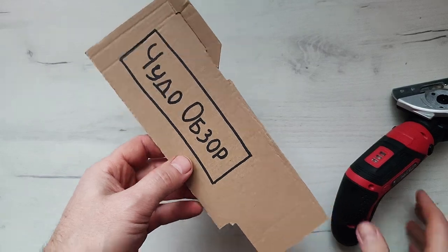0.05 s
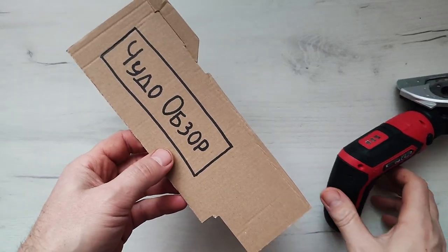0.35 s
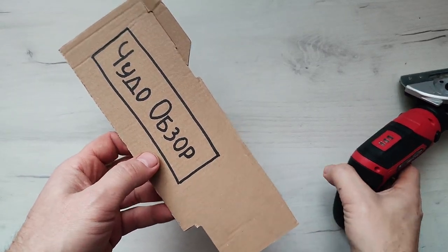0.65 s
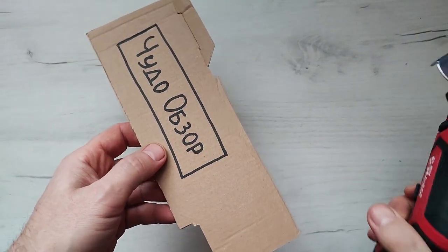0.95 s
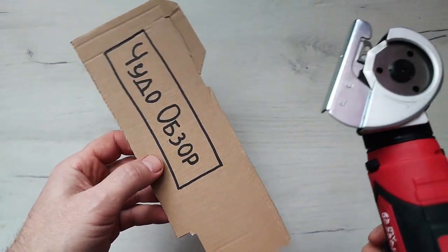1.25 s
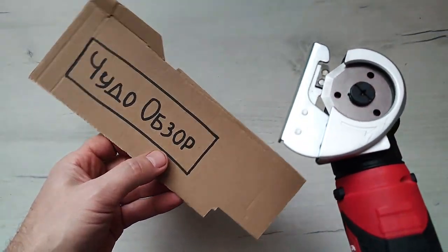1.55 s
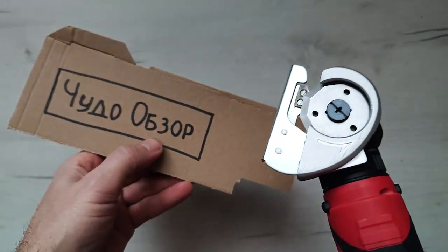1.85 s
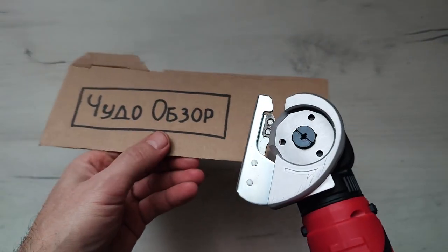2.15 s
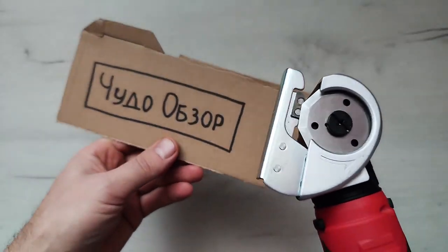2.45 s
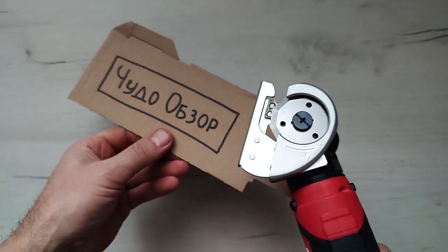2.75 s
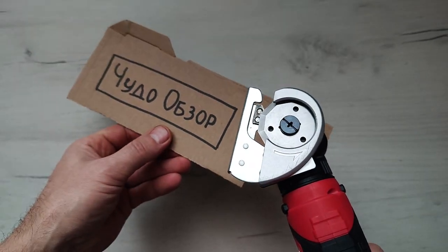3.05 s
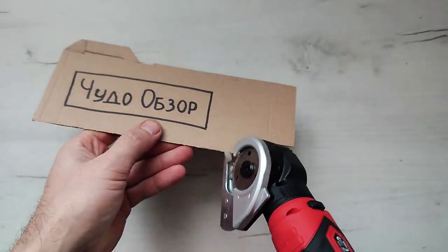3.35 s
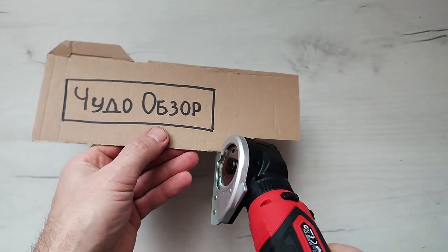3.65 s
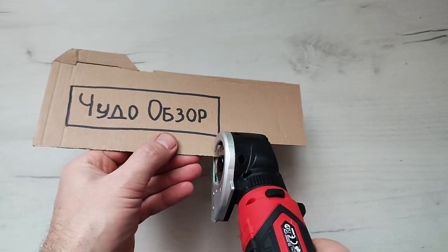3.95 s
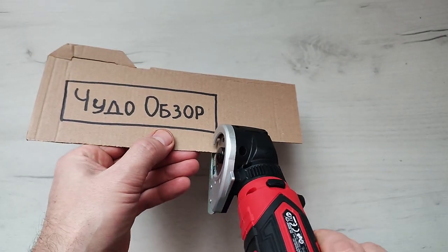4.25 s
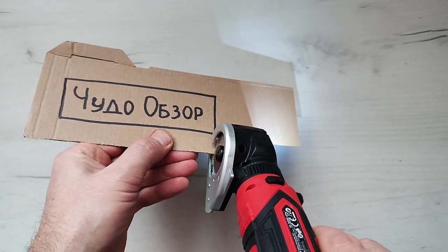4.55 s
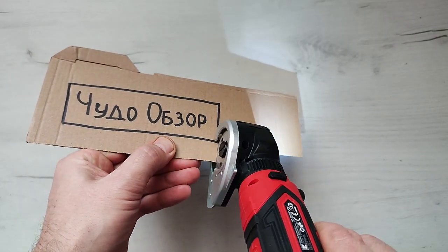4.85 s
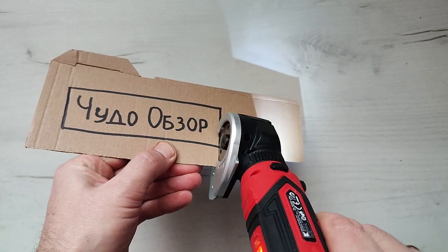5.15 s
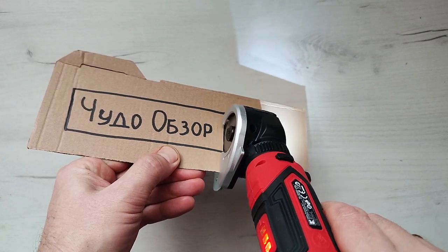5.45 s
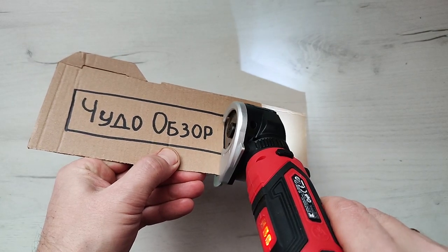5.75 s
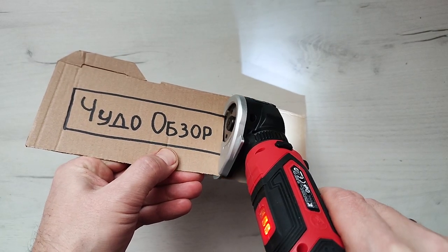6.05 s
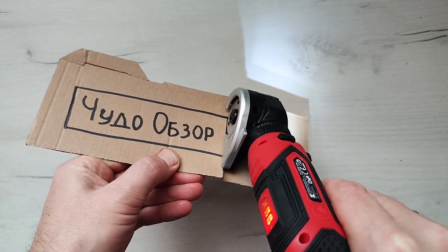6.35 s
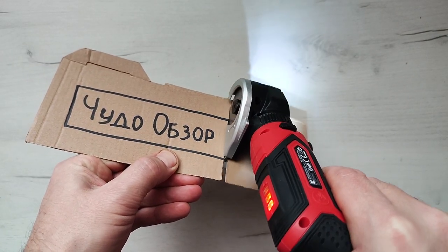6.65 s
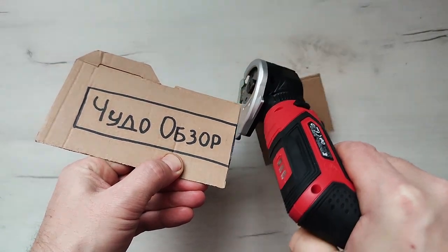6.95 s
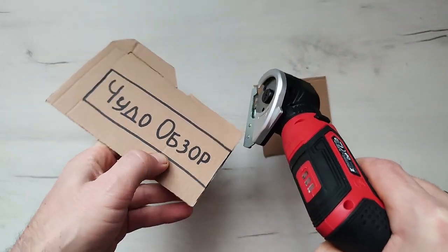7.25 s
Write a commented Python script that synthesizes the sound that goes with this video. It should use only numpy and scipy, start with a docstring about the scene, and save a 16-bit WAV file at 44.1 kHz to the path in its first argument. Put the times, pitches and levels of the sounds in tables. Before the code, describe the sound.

A cordless cutter is dragged briefly on a table and lifted with a clunk. Fingers faintly rustle and tap a cardboard sheet, and the tool's guard scrapes its edge. The small motor then spins up with a rattling gear whine, and the blade chews through the card in rapid, crunchy bites that climb in pitch. The last strip snaps and the motor coasts to rest. Everything is close to the microphone in a quiet room.

```python
"""Cutting cardboard with a rotary blade

A cordless screwdriver with a cutting head is dragged off a table, lifted and set against a card sheet.
Its motor spins up, the gears whine and rattle, and the many-sided blade, geared to it, bites about
thirty times a second. The card's resonance climbs as the cut advances; the last strip tears through,
and the motor coasts to rest in a quiet room."""
import sys
import numpy as np
from scipy import signal
from scipy.fft import rfft, irfft, next_fast_len
from scipy.io import wavfile
from scipy.ndimage import uniform_filter1d, map_coordinates

SR = 44100
rng = np.random.default_rng(int(sys.argv[2]) if len(sys.argv) > 2 else 0)


def pcm_store(signal):
    """Save signal as 16-bit PCM."""
    levels = np.round(np.clip(np.atleast_2d(signal), -1, 1) * 32767)
    wavfile.write(sys.argv[1], SR, levels.astype(np.int16).T)


N = 325899
TIME = np.arange(N) / SR
IMPACT_TIME = TIME[:2048]

MOTOR_ON_S, RELEASE_S, MOTOR_OFF_S = 4.548, 6.96, 7.385
FIRST_BITE_S, BLADE_OUT_S, TEETH_PER_BITE = 4.7065, 6.742, 85
FREE_MESH_HZ = 2800  # gear mesh rate without load
UPPER_MODE_HZ, UPPER_WIDTH_HZ = 1462, 126  # a higher resonance of the sheet

# spectrum of the card's liner snapping: frequency_hz, density_db
CRACK_SPECTRUM = [(60, -53.5), (150, -32.5), (300, -28), (1000, -35), (3000, 8.5), (5000, -3), (7600, 8),
                  (9800, -9.5), (11500, 1.5), (15000, -7.5)]
# modes of the loosely held sheet: pitch_hz, width_hz, level_db
SHEET_MODES = [(179, 79, -0.5), (433, 10, 4.5), (580, 122, 3), (840, 180, -11), (1100, 45, -11),
               (2265, 130, -3), (3270, 160, -9.5)]
# modes of the gearbox housing: pitch_hz, width_hz, level_db
HOUSING_MODES = [(750, 24, 10.5), (2344, 95, 9), (3230, 36, 7), (3760, 28, -10), (4840, 79, -4),
                 (5300, 610, -2), (6000, 46, -15), (6700, 100, -21), (8150, 230, -1)]
# stationary modes of card and cutting head: pitch_hz, width_hz, level_db
HEAD_MODES = [(615, 80, -1.5), (1090, 110, -4), (1950, 240, -9), (2480, 400, -11)]
# moving resonance of the card at the blade: time_s, pitch_hz
CARD_PITCH = [(4.8, 640), (5.1, 830), (5.3, 900), (5.47, 1010), (5.82, 1085), (5.95, 1050), (6.55, 1086),
              (6.78, 820), (7.05, 750)]
# relative strength of the sheet's higher resonance: time_s, level_db
UPPER_MODE_LEVEL = [(4.71, 11), (4.8, 4), (5.25, -9.5), (5.42, 8), (5.58, 8), (5.8, 1), (6.3, 3.5),
                    (6.5, 6), (6.9, 4.5)]


def amp(db):
    """Decibels to amplitude ratio."""
    return 10 ** (np.asarray(db) / 20)


def unit(x):
    """Normalisation to rms 1."""
    return x / np.sqrt(np.mean(x ** 2) + 1e-20)


def along(points, hz):
    """Interpolation of (frequency_hz, value) points on a logarithmic frequency axis."""
    frequencies, values = np.transpose(points)
    return np.interp(np.log(hz + 1), np.log(frequencies + 1), values)


def curve(points, at_s=TIME):
    """Linear interpolation of (time_s, value) points."""
    return np.interp(at_s, *np.transpose(points))


def gate(start_s, end_s):
    """A trapezoidal window with 8 ms edges."""
    return np.clip(np.minimum(TIME - start_s, end_s - TIME) / .008, 0, 1)


def swell(*times_s, shape=(0, 1, 0)):
    """An envelope of quarter sines; by default a rise from 0 to 1 and a fall back."""
    return np.sin(np.pi / 2 * np.interp(TIME, times_s, shape))


def strokes(rows):
    """The summed envelope of sliding movements, each swelling for 44% of its length."""
    return sum(amp(db) * swell(start, start + .44 * (end - start), end) for start, end, db in rows)


def wobble(knots_per_s):
    """Smooth random modulation: a spline through Gaussian values."""
    samples = np.arange(0, N + 16, 16)
    spline = map_coordinates(rng.standard_normal(8192), [samples * knots_per_s / SR], mode="wrap")
    return np.interp(np.arange(N), samples, spline)


def phase(hz):
    """Phase in radians, the integral of instantaneous frequency."""
    return 2 * np.pi * np.cumsum(hz) / SR


def filtered(x, response):
    """Linear filtering: the spectrum times a frequency response."""
    size = next_fast_len(len(x) + 8192)
    return irfft(rfft(x, size) * response(np.fft.rfftfreq(size, 1 / SR)), size)[:len(x)]


def highpass(x, hz):
    """Radiation loss: small bodies radiate little below a cutoff."""
    return signal.sosfilt(signal.butter(4, hz, "highpass", fs=SR, output="sos"), x)


def noise(spectrum, size=N):
    """White noise shaped to a spectrum; rms 1."""
    return unit(filtered(rng.standard_normal(size), lambda hz: amp(along(spectrum, hz))))


def grains(per_s=450, spread_db=4):
    """Shot noise: fibres catch and let go in random impulses."""
    hits = rng.random(N) < per_s / SR
    return hits * rng.choice([-1, 1], N) * amp(spread_db * np.clip(rng.standard_normal(N), -2, 2))


def ring(force, modes):
    """Modal superposition: a force drives damped (pitch_hz, width_hz, level_db) resonators."""
    return filtered(force, lambda hz: sum(
        amp(db) * 1j * hz * width / (pitch ** 2 - hz ** 2 + 1j * hz * width)
        for pitch, width, db in modes))


def gliding_ring(force, pitch_hz, flutter_hz):
    """A moving resonance as a carrier modulated by the low-passed force; rms 1."""
    flutter = filtered(force, lambda hz: 1 / (1 + 1j * hz / flutter_hz) / (1 + 1j * hz / flutter_hz / 1.3))
    return unit(flutter * np.sin(phase(pitch_hz)))


def blow(modes, crumble, decay_s, cutoff_hz):
    """Impact excitation: an impulse and crumbling contact ring the modes; rms 1 over the loudest 2 ms."""
    force = crumble * rng.standard_normal(len(IMPACT_TIME)) * np.exp(-IMPACT_TIME / decay_s)
    force[0] += 1
    softening = signal.butter(2, min(cutoff_hz, SR / 4), fs=SR, output="sos")
    sound = signal.sosfilt(softening, highpass(ring(force, modes), 244))
    return sound / np.sqrt(uniform_filter1d(sound ** 2, size=88).max())


def add(track, start_s, sound):
    """Superposition of a sound on a track."""
    part = track[round(start_s * SR):][:len(sound)]
    part += sound[:len(part)]


def room_air():
    """Ambient noise, strongest in the bass."""
    # background spectrum: frequency_hz, density_db
    air_spectrum = [(25, 4.5), (45, -14.5), (62, -1), (90, -14), (200, -16), (340, -21.5), (560, -20.5),
                    (1200, -27), (4000, -33.5), (8000, -38.5), (14500, -40.5)]
    return amp(-66) * noise(air_spectrum)


def card_taps():
    """Light impacts give a tick and excite the sheet's modes: card tapping the cutting head, and at the end the
    offcut falling away."""
    # taps and their relative strengths: start_s, tick_db, body_db
    taps = [(0.0729, -50.5, -53.5), (0.108, -51.5, -74), (1.7499, -56, -61), (1.947, -44.5, -51.5),
            (2.087, -50.5, -51.5), (2.333, -62, -60.5), (2.51, -43, -68), (2.591, -66, -57),
            (4.021, -68, -54.5), (4.0668, -47.5, -55), (4.1017, -62, -55.5), (4.1846, -60, -87),
            (7.081, -45, -46)]
    out = np.zeros(N)
    for start_s, tick_db, body_db in taps:
        tick = noise(CRACK_SPECTRUM, len(IMPACT_TIME)) * np.exp(-IMPACT_TIME / .0038)
        body = blow(SHEET_MODES, crumble=.83, decay_s=.0081, cutoff_hz=1980)
        add(out, start_s, amp(tick_db - 8) * tick + amp(body_db - 1) * body)
    return out


def table_contact():
    """Friction and impacts force the table's modes; each knock also rings the tool's shell and guard."""
    # the grip dragged over the table: start_s, peak_s, end_s, level_db
    drags = [(0.129, 0.219, 0.35, -52), (0.672, 0.731, 0.83, -55)]
    # the tool knocking and rocking: start_s, clack_db, shell_db, guard_db
    knocks = [(.181, -59, -56, -70), (0.207, -54, -60, -44), (0.4974, -39, -32.5, -48),
              (.5065, -47.5, -36, -65), (.5098, -46, -44, -52), (.529, -52, -47, -57),
              (.612, -64, -61, -69)]
    # dry contact with the table: frequency_hz, density_db
    clack_spectrum = [(80, 8.5), (200, -7), (800, 0), (1100, -10), (3200, -16.5), (5000, -28.5),
                      (8000, -22), (10000, -42), (14000, -34.5)]
    # modes of the plastic shell: pitch_hz, width_hz, level_db
    shell_modes = [(230, 160, 23), (515, 130, 20.5), (810, 120, -17.5), (3100, 500, 7)]
    # modes of the table with the tool on it: pitch_hz, width_hz, level_db
    table_modes = [(146, 37, 6.5), (206, 54, 6.5), (282, 19, 5), (401, 35, -0.5), (506, 18, 3),
                   (610, 50, -9.5), (727, 18, -8), (823, 7.2, 5.5), (1227, 7.2, -19.5), (1450, 133, -27)]
    force, direct, t = np.zeros(N), np.zeros(N), TIME[:SR // 3]
    for start_s, peak_s, end_s, db in drags:
        pressure = swell(start_s, peak_s, end_s) ** 2 * amp(db + 4.1 * wobble(160))
        force += pressure * noise([(200, -1), (900, -4.5), (3000, -13.5), (9000, -13.5)])
    guard = np.sin(2 * np.pi * 848 * t) + .4 * np.sin(2 * np.pi * 826 * t)  # two close modes beat
    guard *= amp(-60 * t / .25)
    for start_s, clack_db, shell_db, guard_db in knocks:
        decay = np.exp(-t / .0091) + amp(-9.5) * np.exp(-t / .05)
        clack = amp(clack_db) * noise(clack_spectrum, len(t)) * decay
        shell = blow(shell_modes, crumble=.03, decay_s=.002, cutoff_hz=2500)
        add(direct, start_s, clack + amp(guard_db) * guard)
        add(direct, start_s, amp(shell_db) * shell)
        add(force, start_s, amp(2.5) * clack)
    return direct + amp(7.5) * highpass(ring(force, table_modes), 72)


def handling():
    """Sliding friction: fingers brush the card, then the guard scrapes its edge; the sheet rings faintly."""
    # hands shifting on tool and card: start_s, end_s, level_db
    hand_strokes = [(.64, 0.86, -63.5), (0.971, 1.07, -72), (1.16, 1.28, -76), (1.29, 1.43, -76),
                    (1.469, 1.555, -73.5), (1.735, 1.79, -71), (1.8, 1.92, -71), (1.88, 2.02, -61),
                    (1.97, 2.12, -68), (2.13, 2.29, -66.5), (2.298, 2.4, -63.5), (2.425, 2.49, -66),
                    (2.5, 2.7, -66.5)]
    # rustle of the hands: frequency_hz, density_db
    rustle_spectrum = [(88, -43), (150, -6.5), (211, -1), (333, -19), (426, 1.5), (468, -45), (515, -20),
                       (659, -10), (812, -1), (964, -5), (1700, -15.5), (2140, -3), (3010, -12.5),
                       (6310, -8), (14000, -21)]
    # the guard sliding along the edge: start_s, end_s, level_db
    guard_slides = [(3.12, 3.35, -67.5), (3.35, 3.56, -67.5), (3.57, 3.92, -67), (3.85, 3.98, -65.5),
                    (3.95, 4.08, -69.5), (4.05, 4.14, -65)]
    # friction of guard on card: frequency_hz, density_db
    edge_spectrum = [(88, -37), (150, -9), (250, 1.5), (387, -23), (556, 0), (672, -3), (1120, 0),
                     (1310, -8), (1440, -5.5), (1980, -7.5), (2950, -11.5), (7770, -10.5), (14000, -35)]
    # modes of the sheet braced against the guard: pitch_hz, width_hz, level_db
    braced_modes = [(496, 75, 0), (965, 74, -23), (1436, 100, -0.5), (2390, 48, -20), (2910, 170, -6)]
    scratches = grains()
    grit = unit(filtered(scratches, lambda hz: amp(along(rustle_spectrum, hz))))
    sheet = unit(ring(scratches, SHEET_MODES))
    brush = unit(noise(rustle_spectrum) + amp(-8) * grit + amp(-5.5) * sheet)
    scrape = unit(noise(edge_spectrum) + amp(-3) * unit(ring(scratches, braced_modes)))
    catching = unit(amp(.72 * wobble(380) + 2.5 * wobble(35)))
    settling_grip = amp(-79) * gate(.84, 2.7)
    return catching * ((strokes(hand_strokes) + settling_grip) * brush + strokes(guard_slides) * scrape)


def grip_judder():
    """Stick-slip oscillation of the rubber grip slows as the tool lifts off."""
    # rate of slipping: time_s, rate_hz
    slip_rate = [(0.71, 360), (0.79, 216)]
    slip_hz = curve(slip_rate) * (1 + .069 * wobble(150))
    return amp(-45.5) * swell(.7, .75, .815) * np.sin(phase(slip_hz))


def backlash_clack():
    """The gears take up their slack at the start, and the impact rings the housing."""
    out = np.zeros(N)
    add(out, MOTOR_ON_S, amp(-52) * blow(HOUSING_MODES, crumble=.32, decay_s=.009, cutoff_hz=4400))
    return out


def mesh_rate():
    """Tooth-passing frequency in Hz: inertia makes the motor spin up and coast down gradually."""
    # running speed, sagging as the blade is loaded: time_s, mesh_hz
    running_speed = [(4.78, 2606), (4.98, 2483), (5.16, 2565), (5.36, 2505), (5.55, 2545), (5.8, 2602),
                     (6.17, 2606), (6.33, 2545), (6.52, 2612), (6.74, 2535), (6.93, 2560)]
    spin_up_s, coast_s = .04, .46
    spin_up = 1 - np.exp(-np.maximum(TIME - MOTOR_ON_S, 0) / spin_up_s)
    coast = np.clip(1 - (TIME - RELEASE_S) / coast_s, 0, 1) ** 1.05
    return curve(running_speed) * spin_up * coast


def gear_whine(mesh_hz, mesh_phase):
    """Periodic tooth contact radiates tones, modulated by the rotor and stronger under torque."""
    # gear tones: mesh_multiple, level_db
    partials = [(1, -3.5), (2.015, 0.5)]
    full_torque_sag_hz = 111
    torque = np.clip((FREE_MESH_HZ - mesh_hz) / full_torque_sag_hz, 0, 1) * gate(MOTOR_ON_S, BLADE_OUT_S)
    engaged = np.interp(TIME, [MOTOR_ON_S, 4.63], [0, 1]) ** 2
    coasting = gate(RELEASE_S, MOTOR_OFF_S)
    gain = engaged * amp(-60 + 10.5 * torque + 5.5 * coasting) * (mesh_hz / FREE_MESH_HZ) ** 1.32
    tones = sum(amp(db + 3.2 * wobble(12) + 2.2 * wobble(150)) * np.sin(multiple * mesh_phase)
                for multiple, db in partials)
    return gain * tones * (1 + .6 * np.cos(mesh_phase / 9))


def gear_rattle(mesh_hz, mesh_phase):
    """Tooth impacts ring the housing and small gears add wavering shaft orders; both grow with speed."""
    # spectrum of the rattle: frequency_hz, density_db
    gear_spectrum = [(150, -6), (400, -1.5), (700, -6), (1000, 4), (1700, -7), (2400, 0.5), (3000, -4.5),
                     (3600, 2.5), (4400, -3.5), (5100, -0.5), (6100, -4), (7600, 0), (9800, -11.5),
                     (11300, -9), (14500, -11)]
    pace = mesh_hz / FREE_MESH_HZ
    chatter = np.zeros(N)
    for order in np.linspace(.8, 5.4, 44) + rng.uniform(-.05, .05, 44):
        gain = amp(along(gear_spectrum, order * mesh_hz) + 3 * wobble(22))
        chatter += gain * np.sin(order * mesh_phase + wobble(60))
    chatter = unit(chatter * gate(MOTOR_ON_S, MOTOR_OFF_S))
    teeth = noise(gear_spectrum)
    housing = unit(ring(noise([(500, .39), (2000, 4.8)]), HOUSING_MODES))
    pulsing_db = .5 * np.cos(mesh_phase / 9) + .53 * wobble(500) + .79 * wobble(40)
    rattle = unit((teeth + amp(-6) * housing) * amp(pulsing_db))
    return amp(-45.4) * pace * rattle + amp(-50.5) * pace ** 2 * chatter


def motor(mesh_hz):
    """Gears and rotor share one rotation; backlash modulates its frequency, most under load."""
    smear = np.maximum(.65, gate(FIRST_BITE_S, BLADE_OUT_S))
    mesh_phase = phase(mesh_hz * (1 + smear * (.008 * wobble(70) + .013 * wobble(400))))
    whine = gear_whine(mesh_hz, mesh_phase)
    # the three-pole rotor's own tone, heard as it coasts
    rotor_gain = amp(-59 + 2.2 * wobble(55)) * gate(RELEASE_S, MOTOR_OFF_S) * (mesh_hz / FREE_MESH_HZ) ** 2
    rotor_tone = rotor_gain * np.sin(mesh_phase / 3)
    return gate(MOTOR_ON_S, MOTOR_OFF_S) * (whine + gear_rattle(mesh_hz, mesh_phase) + rotor_tone)


def bite_schedule(mesh_hz):
    """Gear reduction times one bite per blade corner; returns rows with the columns of listed_bites."""
    # how hard the blade is pushed: time_s, thud_db
    push = [(4.68, -32), (5.1, -30), (5.4, -24), (5.62, -25.5), (5.78, -31), (5.94, -26.5), (6.17, -30),
            (6.31, -28), (6.47, -30.5), (6.66, -33.5), (6.9, -39)]
    # bites listed one by one, each replacing the nearest scheduled bite: start_s, thud_db, relative_crack_db,
    # pitch_hz, width_hz
    listed_bites = [(4.805, -29.5, -16, 630, 201.5), (4.8379, -24.5, -41, 620, 169),
                    (4.8697, -30, -43, 684, 260), (4.9394, -20.5, -14.5, 720, 260),
                    (4.973, -19.5, -13, 750, 260), (5.0409, -23.5, -12.5, 723, 220),
                    (5.0747, -25.5, -18, 800, 240), (5.107, -28, -13, 760, 262),
                    (5.1413, -28.5, -17, 770, 260), (5.1731, -24.5, -24, 770, 220),
                    (5.2082, -22, -13, 804, 240), (5.242, -22.5, -23, 810, 220),
                    (5.2747, -29.5, -19, 840, 240), (5.307, -28, -31, 900, 198),
                    (5.3415, -22, -17.5, 940, 160), (5.374, -24, -11.5, 960, 260),
                    (5.408, -22.5, -13.5, 1014, 240), (5.4409, -19.5, -17, 944, 171.5),
                    (5.508, -20.5, -39, 988, 89.8), (5.5413, -21.5, -22, 1000, 199),
                    (5.5748, -21.5, -23, 940, 200), (5.6089, -24.5, -15, 1040, 200),
                    (5.8742, -24.5, -16.5, 1010, 200), (5.9053, -22, -17.5, 1020, 280),
                    (6.0037, -22.5, -13, 1064, 260), (6.0367, -19.5, -18, 1000, 137),
                    (6.069, -23.5, -28, 1050, 110), (6.1007, -18, -12.5, 1010, 260),
                    (6.134, -28, -8, 1100, 300), (6.202, -15, -13, 1020, 320),
                    (6.2346, -15, -13, 1030, 320), (6.267, -21, -9, 1030, 220),
                    (6.367, -23.5, -12, 870, 326), (6.4001, -28, -63, 674, 170),
                    (6.43, -20.5, -27.5, 1100, 218), (6.5318, -19, -35, 1100, 220),
                    (6.5626, -17.5, -13.5, 1100, 280), (6.5967, -26, -10.5, 1050, 280),
                    (6.7277, -21.5, -9.5, 790, 220), (6.8663, -20.5, -33.5, 1070, 378)]
    corners = np.cumsum(mesh_hz) / SR / TEETH_PER_BITE
    corners -= np.interp(FIRST_BITE_S, TIME, corners)
    start_s = np.interp(np.arange(np.interp(RELEASE_S, TIME, corners)), corners, TIME)
    scatter = rng.standard_normal((len(start_s), 2))
    thud_db = curve(push, start_s) + 1.2 * scatter[:, 0]
    crack_db = -28.5 - 3 * scatter[:, 1]
    width_hz = np.full(len(start_s), 210)
    bites = np.column_stack([start_s, thud_db, crack_db, curve(CARD_PITCH, start_s), width_hz])
    for burst in listed_bites:
        bites[np.argmin(abs(start_s - burst[0]))] = burst
    return bites


def crush_db(bites):
    """Contact load raises the friction level in a Gaussian pulse around each bite."""
    peaks = np.zeros(N)
    for start_s, thud_db, *_ in bites:
        peaks[round(start_s * SR)] = amp(thud_db / 2)
    lag_s = np.arange(-1024, 1025) / SR
    load = signal.fftconvolve(peaks, np.exp(-((lag_s - .001) / .0045) ** 2), "same")
    return 9.5 * load / load.max()


def blade_rubbing(bites):
    """Friction on the fibres drives the card's modes; one climbs as the uncut part shortens."""
    # low flexing modes, freed as the cut deepens: pitch_hz, width_hz, level_db
    flex_modes = [(278, 94, -3), (383, 120, -5), (624, 62, 6.5), (614, 35, -13)]
    sinking_s, leaving_s = np.maximum(4.9 - TIME, 0), np.maximum(TIME - BLADE_OUT_S, 0)
    rub_db = -38.5 - 37.5 * sinking_s - 69 * leaving_s + wobble(8) + crush_db(bites)
    fibres = rng.standard_normal(N) * amp(4.4 * wobble(300))
    contact = np.interp(TIME, [4.6, 5.25, 5.38, 6.5, 6.8], [.85, 1.37, 1.94, .87, 1.06])
    card = contact * gliding_ring(fibres, curve(CARD_PITCH), flutter_hz=80)
    head = unit(highpass(ring(fibres, HEAD_MODES), 435))
    upper = unit(highpass(ring(fibres, [(UPPER_MODE_HZ, UPPER_WIDTH_HZ, 0)]), 1140))
    upper *= amp(curve(UPPER_MODE_LEVEL))
    freed = swell(5.08, 8.47, shape=(0, 1)) * (TIME <= 7.1)
    flex = freed * unit(highpass(ring(fibres, flex_modes), 193))
    resonances = amp(-7) * card + amp(-9) * head + amp(-15.5) * upper + amp(-5.5) * flex
    return gate(MOTOR_ON_S, MOTOR_OFF_S) * amp(rub_db) * resonances


def blade_bites(bites):
    """Impact and fracture: each corner crushes the card and snaps its liner; a harder snap is brighter."""
    out = np.zeros(N)
    thump = blow([(280, 107, 0)], crumble=0, decay_s=1, cutoff_hz=600)  # the whole sheet dips
    crack_envelope = np.exp(-IMPACT_TIME / .0023) * (1 - np.exp(-IMPACT_TIME / .00057))
    for start_s, thud_db, crack_db, pitch_hz, width_hz in bites:
        upper_mode = (UPPER_MODE_HZ, UPPER_WIDTH_HZ, curve(UPPER_MODE_LEVEL, start_s))
        modes = [(pitch_hz, width_hz, 10), upper_mode] + HEAD_MODES
        thud = blow(modes, crumble=.06, decay_s=.003, cutoff_hz=4200 * amp(crack_db / 3))
        crack = noise(CRACK_SPECTRUM, len(IMPACT_TIME)) * crack_envelope
        bite = amp(thud_db) * (amp(-4.5) * thud + amp(crack_db + 3.5) * crack)
        # the thump grows as the cut frees the sheet and fades once the blade leaves
        past_exit_s = start_s - BLADE_OUT_S
        thump_db = -41.5 + 3 * past_exit_s - 69 * max(past_exit_s, 0) + rng.normal(0, 2.77)
        add(out, start_s, bite + amp(thump_db) * thump)
    return out


def shudder(mesh_hz):
    """Forced vibration: the tool hums at twice the bite rate; the sheet's lowest mode climbs and fades."""
    hum_gain = swell(5.1, 6.45, 6.95) * amp(-57 + 1.5 * wobble(12))
    hum_hz = 2 * mesh_hz / TEETH_PER_BITE
    flex_hz = .13 * curve(CARD_PITCH) * (1 + .15 * wobble(60))
    flex_gain = (TIME >= 4.91) * swell(4.65, 5.58, shape=(1, 0)) * amp(-55.5 + 5.4 * wobble(30))
    return hum_gain * np.sin(phase(hum_hz)) + flex_gain * np.sin(phase(flex_hz))


def cut_through():
    """Fracture rings the last strip as it tears and snaps; the offcut droops with a falling creak."""
    # modes of the last strip: pitch_hz, width_hz, level_db
    strip_modes = [(270, 70, -2), (405, 64, 4), (600, 70, -2), (810, 150, 0), (1430, 90, -9)]
    # creak of the drooping offcut: time_s, pitch_hz
    creak_pitch = [(6.87, 600), (6.9, 430), (6.93, 230)]
    tear = unit(highpass(ring(grains(), strip_modes), 200))
    creak = gliding_ring(rng.standard_normal(N), curve(creak_pitch), flutter_hz=45)
    out = amp(-40) * swell(6.68, 6.735, 6.88) * tear + amp(-41) * swell(6.86, 6.89, 6.945) * creak
    add(out, 6.727, amp(-30) * blow(strip_modes, crumble=.1, decay_s=.003, cutoff_hz=3000))
    return out


def reverberation(x):
    """Convolution with a small room's diffuse tail, which decays faster in the treble."""
    # reverberation time: frequency_hz, t60_s
    decay_times = [(150, 0.36), (1000, 0.16), (10000, 0.1)]
    hz, t, spectra = signal.stft(rng.standard_normal(SR // 2), SR, nperseg=256)
    decay = amp(-60 * t / along(decay_times, hz)[:, None])
    tail = signal.istft(spectra * decay, SR, nperseg=256)[1]
    return signal.fftconvolve(x, tail / np.linalg.norm(tail))[:N]


def scene():
    """Superposition of nearby sources, their weak reverberation and faint room noise."""
    mesh_hz = mesh_rate()
    bites = bite_schedule(mesh_hz)
    direct = backlash_clack() + motor(mesh_hz)
    direct += blade_rubbing(bites) + blade_bites(bites) + shudder(mesh_hz)
    direct += table_contact() + grip_judder() + handling() + card_taps()
    return (direct + amp(-13) * reverberation(direct) + room_air())[None]


def record(dry):
    """An opening transient, a settling offset with one pop, is added; a low-pass limits the band."""
    settle_s, pop_s, top_hz = .15, .0165, 14350
    offset = -.22 * (1 + TIME / settle_s) * np.exp(-TIME / settle_s)
    pop = .05 * (TIME > pop_s) * np.exp(-np.abs(TIME - pop_s) / .025)
    return np.array([filtered(x + offset + pop, lambda hz: hz < top_hz) for x in dry])


dry = scene()
out = record(dry)
pcm_store(out)
```